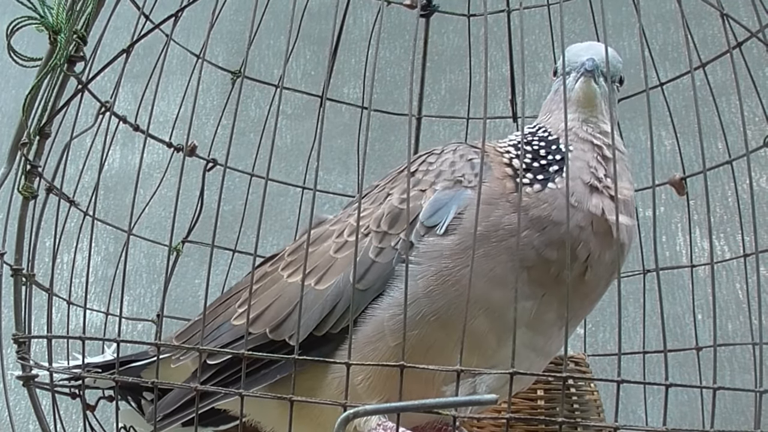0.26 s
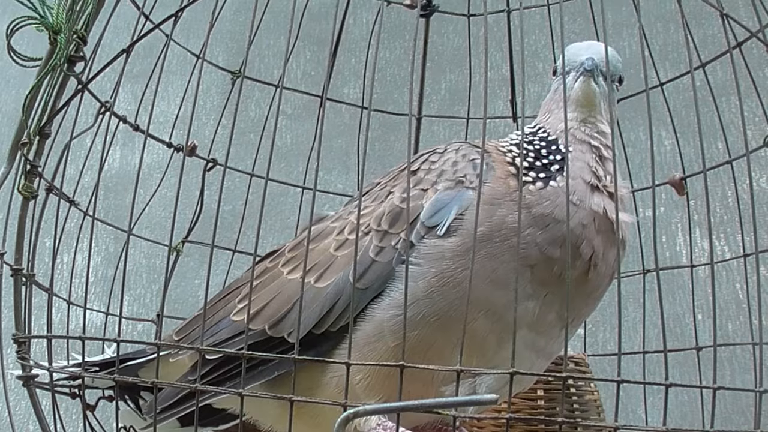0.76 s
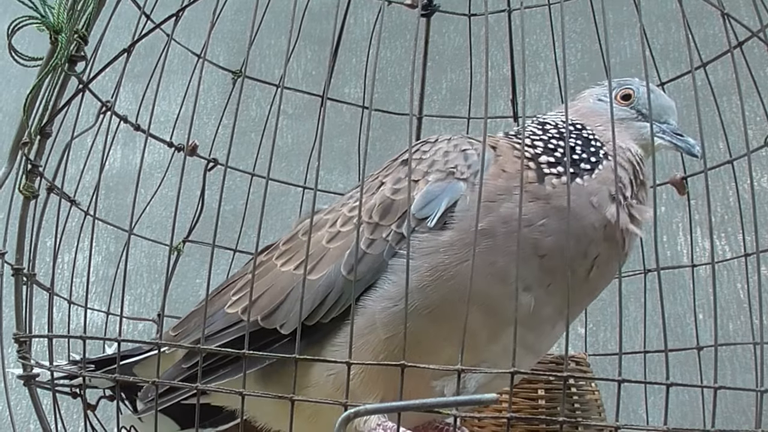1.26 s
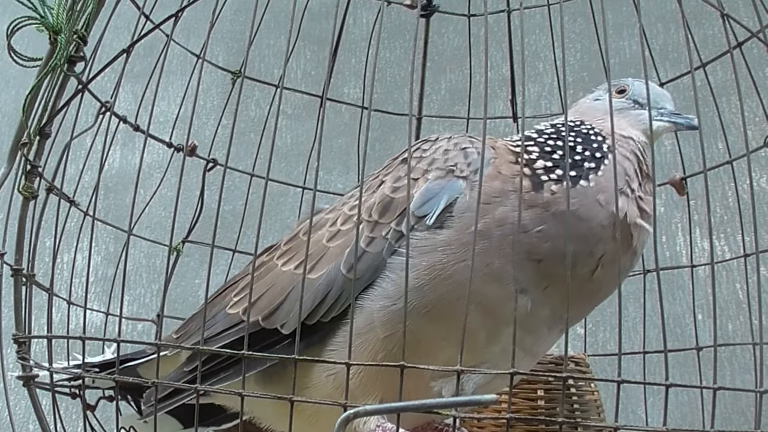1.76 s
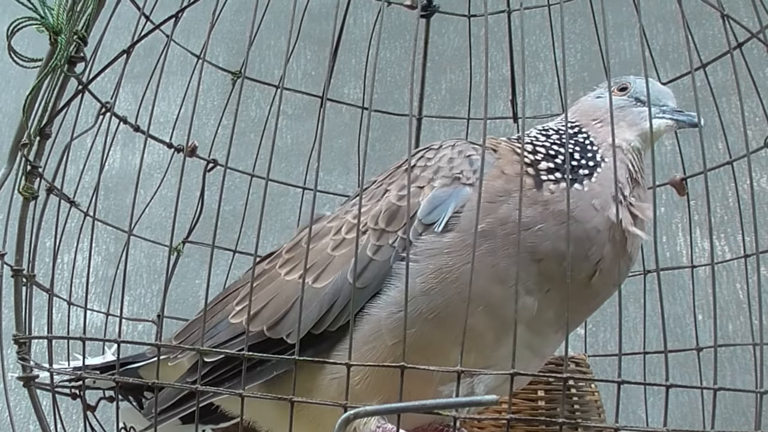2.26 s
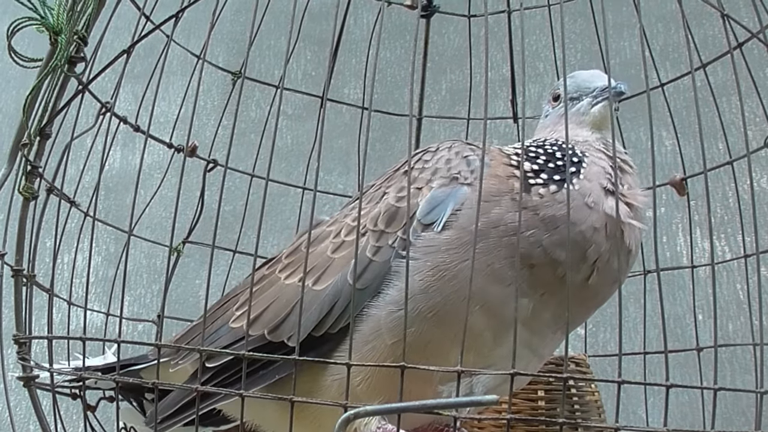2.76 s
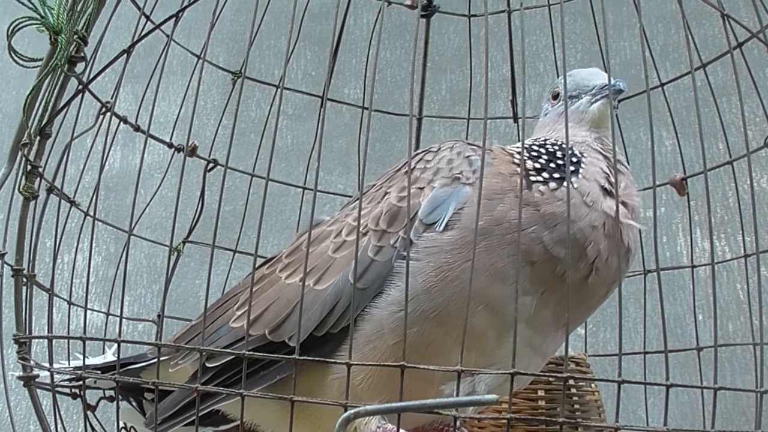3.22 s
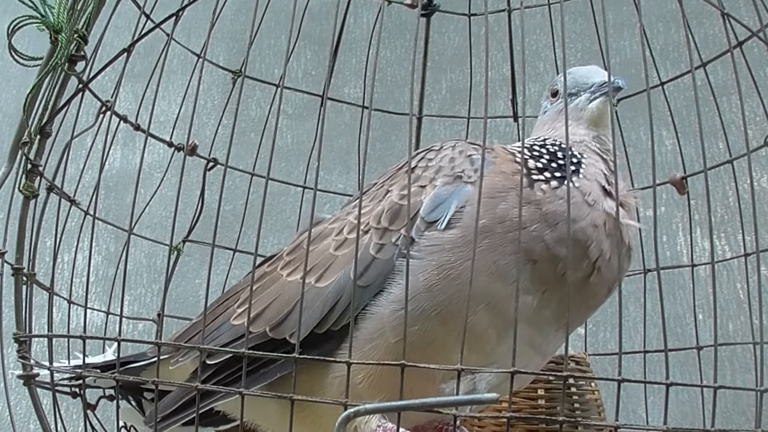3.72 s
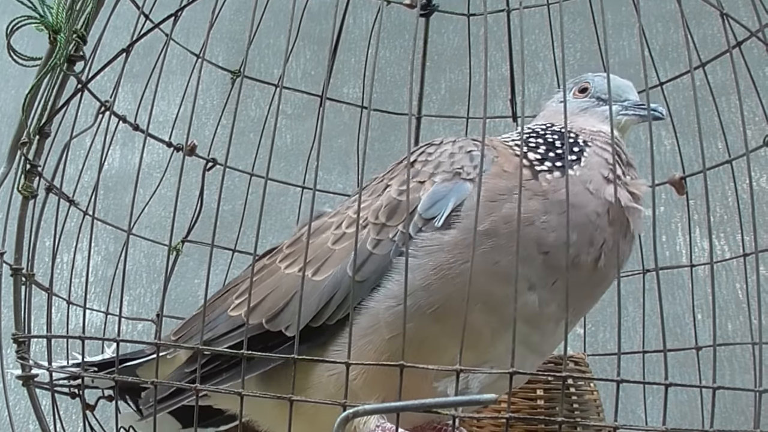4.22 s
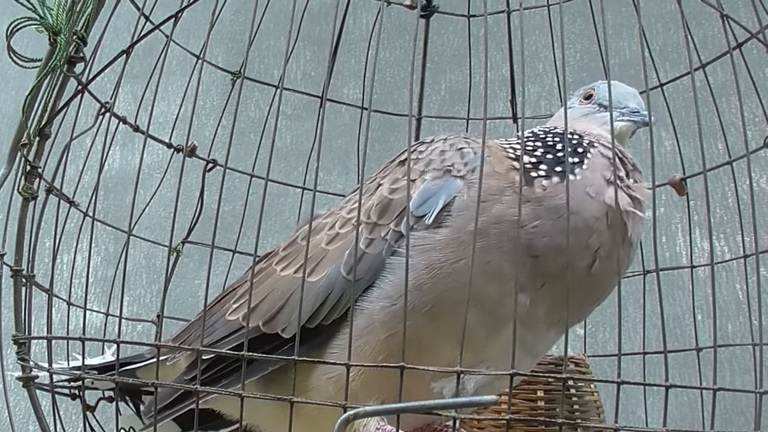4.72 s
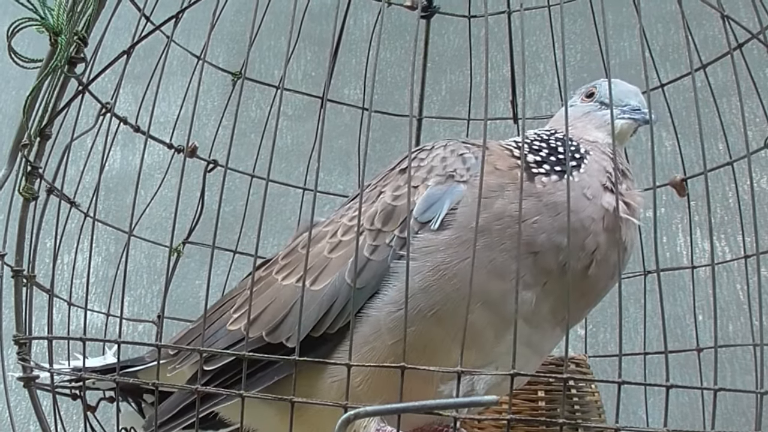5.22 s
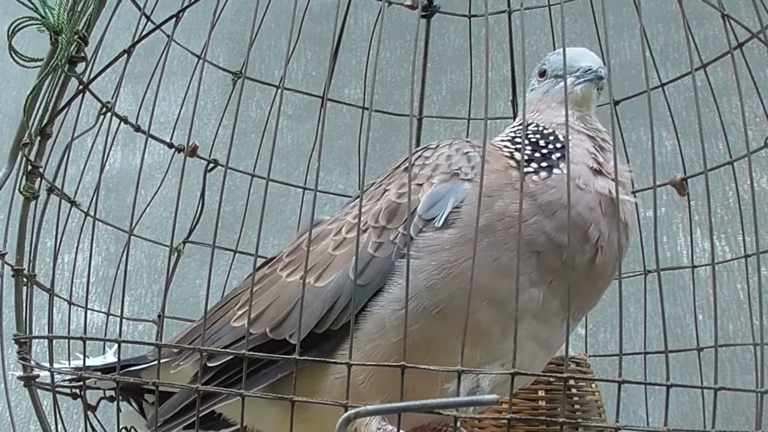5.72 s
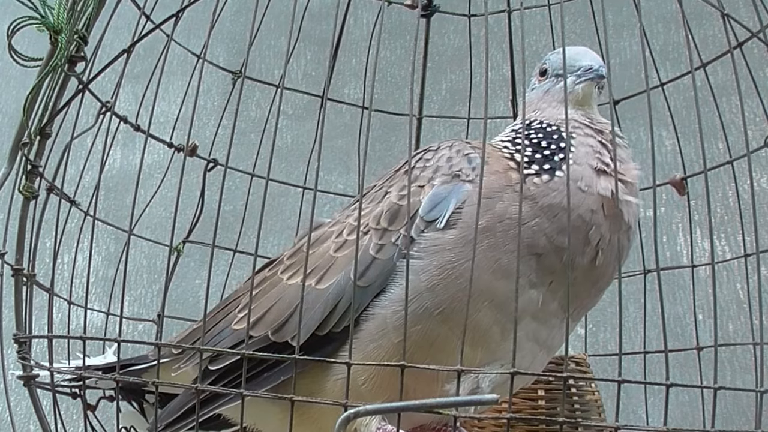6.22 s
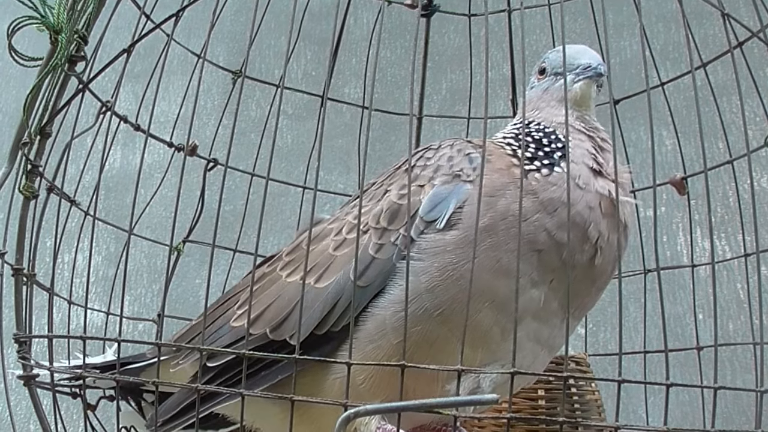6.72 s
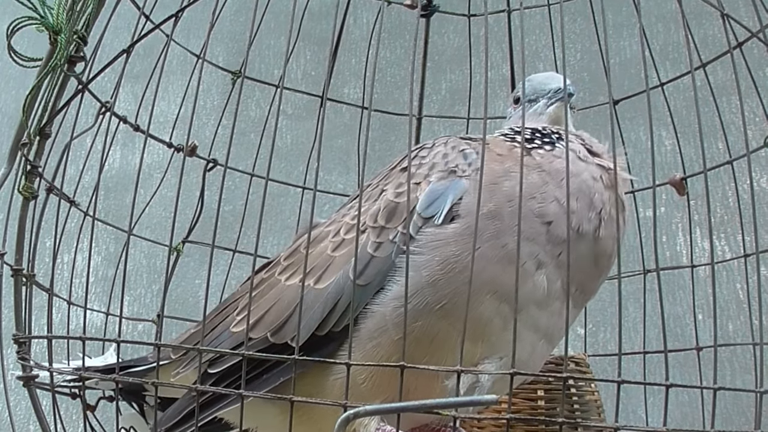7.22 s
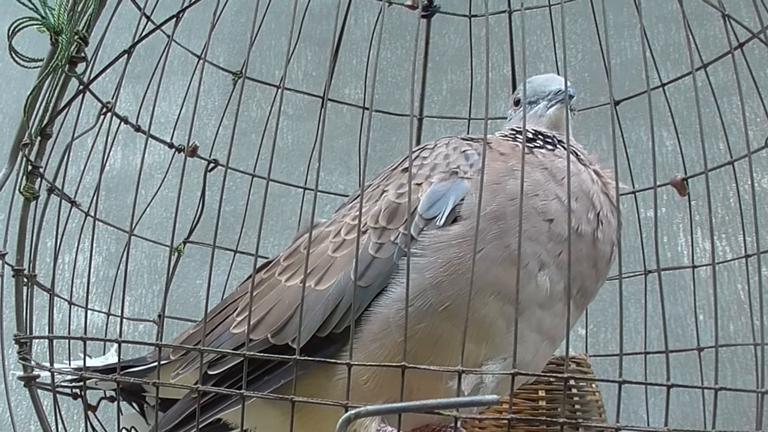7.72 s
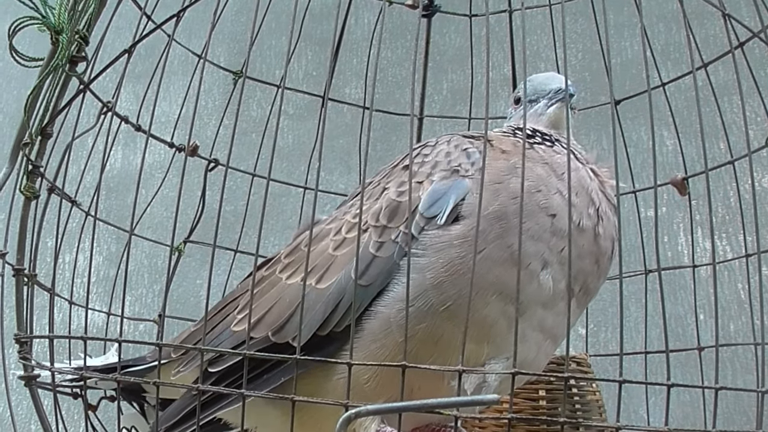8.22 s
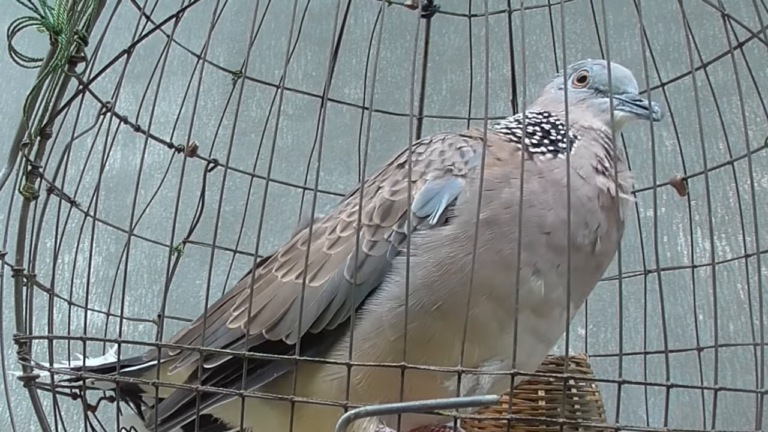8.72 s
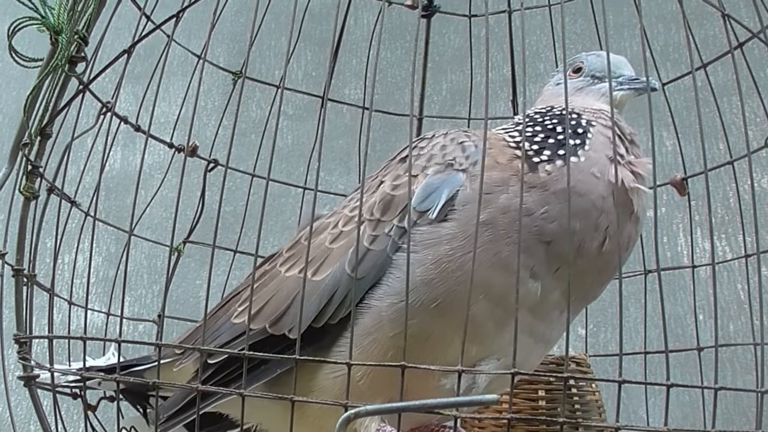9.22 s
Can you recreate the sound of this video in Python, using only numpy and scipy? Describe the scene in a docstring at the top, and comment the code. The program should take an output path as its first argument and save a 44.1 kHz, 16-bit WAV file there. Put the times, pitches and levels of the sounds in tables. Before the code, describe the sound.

A spotted dove coos three fluttering phrases up close, over faint cicadas and a distant traffic rumble.

```python
"""Distant cicadas buzz, chirp and whine over a traffic rumble, with faint rustles and scuffs.
Close to the camera, a caged spotted dove sings three phrases: two short rising coos, a long falling one.
Each coo is a nearly pure tone, chopped by a fast flutter in the throat and echoed faintly by walls.
The cicadas buzz as their tymbal clicks ring their bodies; the limiter ducks them under the loud coos."""
import sys
import numpy as np
from scipy import signal
from scipy.fft import rfft, irfft, next_fast_len
from scipy.io import wavfile
from scipy.ndimage import minimum_filter1d, map_coordinates

SR = 44100
rng = np.random.default_rng(int(sys.argv[2]) if len(sys.argv) > 2 else 0)


def generate_wav(sig):
    """Save sig (samples, or channels by samples) to the path in sys.argv[1] as 16-bit PCM at SR."""
    pcm = np.round(np.clip(np.atleast_2d(sig).T, -1, 1) * 32767).astype(np.int16)
    wavfile.write(sys.argv[1], SR, pcm)


N = 417627
TOP_HZ = 15250

# Stereo image of the ambience: freq_hz, left_right_correlation
STEREO_LIKENESS = [(100, 0.88), (700, 0.64), (2000, 0.31), (5000, 0.66), (8500, 0.19), (14000, 0.19)]
# Traffic faders, before trims: time_s, rumble_db, low_drone_db, high_drone_db, overtones_db
TRAFFIC_FADERS = [(0, -56, -61, -54.5, -73), (.8, -54.5, -53.5, -61.5, -49.5), (2.6, -55, -52, -68, -48),
                  (3.9, -55.5, -51, -72.5, -56.5), (4.7, -54.5, -60.5, -62, -55.5),
                  (5.9, -56, -51.5, -67.5, -53), (7, -55, -52, -52, -49.5), (8.1, -57.5, -57, -64, -53.5),
                  (9.47, -56.5, -69, -71.5, -62)]
# Noise colours of the traffic and the bird's scuffs: freq_hz, gain_db
RUMBLE_EQ = [(20, -24.5), (35, -16.5), (60, -3), (120, -2.5), (190, -2.5), (290, -1), (400, -6),
             (700, -9.5), (1000, -14.5), (1400, -19.5), (1900, -31), (4000, -62.5)]
HISS_EQ = [(500, -14), (1500, -3), (2400, 1.5), (4200, 1), (7000, -2), (10000, -3), (13000, 1), (14600, 0),
           (15500, -16)]
SCUFF_EQ = [(500, -20), (2000, -3), (4500, -3), (8000, -10.5), (14000, -22.5)]
# Soft rustles, two brief low knocks ringing near 770 Hz and, in the last row, a faint breathy overtone
# of the last long coo: centre_s, half_length_s, centre_hz, width_octaves, level_db
SWELL_CUES = [(0.051, .12, 1670, 0.7, -59), (.06, .27, 810, 0.14, -50.5), (0.459, .13, 840, 0.069, -49),
              (0.889, .13, 1590, .3, -55), (2.186, 0.12, 2090, 0.16, -59.5), (2.258, 0.04, 750, 0.09, -46),
              (4.018, .14, 6540, 1, -57), (4.211, .15, 5380, .93, -56.5), (7.02, .033, 766, .1, -50),
              (8.671, .15, 2200, 0.45, -62), (9.11, .13, 2130, .16, -58)]
# The bird shifting about: start_s, level_db
SCUFF_CUES = [(.145, -60), (.43, -59), (1.304, -53), (2.585, -52), (3.37, -57)]

# Cicada faders, before trims: time_s, chorus_db, nearest_buzz_db, nearest_whine_db
CICADA_FADERS = [(0, -61, -65.5, -65.5), (1.9, -59.5, -62, -57), (2.3, -59.5, -55, -54.5),
                 (3.7, -58.5, -56.5, -50.5), (5.2, -59, -56, -55.5), (6.2, -59, -55, -57),
                 (7.5, -58, -60.5, -58.5), (9.47, -62, -65.5, -60.5)]
# Body resonances of the chorus, the nearest cicada and the chirper: centre_hz, width_hz, gain_db
CHORUS_MODES = [(2953, 140, -.5), (5868, 330, 1.5), (8550, 620, -3.5), (11400, 460, -5), (13900, 370, -5)]
BUZZ_MODES = [(8720, 110, -12), (11570, 400, -6), (14300, 360, 2)]
CHIRP_MODES = [(5900, 130, -6), (8510, 230, -11), (11200, 300, -7.5), (14080, 220, -0.5)]
CICADA_PHRASES = [(0, .6), (1.63, 4), (2.48, 6), (4.02, 9), (6.18, 13), (7.72, 17), (9.45, 21)]  # the nearest cicada's pacing: time_s, phrases_sung
CLICK_RATE = [(0, 284), (2.3, 280), (5.5, 275.3), (9.5, 270)]  # its tymbal's base beat: time_s, rate_hz
WHINE_GLIDE = [(0, 6024), (1.5, 5863), (2.5, 5750), (6.5, 5668), (9.47, 5594)]  # its sinking whine: time_s, pitch_hz
CHIRP_CUES = [(0.183, 1.4, .39, -63), (6.25, 8.1, .227, -56), (8.277, 9.47, .227, -59)]  # runs of even chirps: start_s, end_s, period_s, level_db
SQUEAK_CUES = [(.98, 5860, -56), (2.68, 5930, -53.5), (8.3, 5790, -58)]  # stray insect whines: centre_s, pitch_hz, level_db

WALL_TAPS = [(.055, -34.5), (.105, -38), (.132, -39)]  # slaps off the walls: delay_s, gain_db
DOVE_PAN = [(450, 1.4), (750, 2.1), (1200, 3.3)]  # the dove's lean to the left: freq_hz, left_over_right_db
THROAT_EQ = [(850, -2.5), (1000, -16), (1130, -26), (1400, -38), (1600, -49), (1900, -51), (2200, -56),
             (2500, -65), (3400, -50), (4400, -46), (5200, -70)]  # what the swollen throat passes of the overtones: freq_hz, gain_db
RASP_EQ = [(250, -29), (450, 2), (800, -0.5), (1200, -3), (1450, -17.5), (1750, -25.5)]  # colour of the air in the flutter: freq_hz, gain_db
# Contour of each kind of coo, before stretch, shift and gain: time_s, pitch_hz, level_db
OPENING_CONTOUR = [(0, 418, -30), (.011, 516, -23), (.032, 617, -11.5), (.054, 641, -9), (.07, 602, -14),
                   (.09, 603, -30.5)]
RISING_CONTOUR = [(0, 559.4, -40.5), (.028, 515.3, -35), (.042, 528.5, -18.5), (.072, 628.6, -10.5),
                  (.092, 671.5, -1.5), (.106, 738, -1.5), (.116, 796.3, -6.5), (.13, 780, -2.5),
                  (.142, 785, -6), (.151, 674, -3.5), (.158, 709, -23), (.175, 728, -30)]
FALLING_CONTOUR = [(0, 615, -28), (.008, 645, -4.5), (.016, 654, -8), (.025, 662.4, -32), (.032, 691, -0.5),
                   (.07, 750, -2), (.125, 722.3, -2.6), (.21, 688, -2), (.255, 650.6, -4.5),
                   (.305, 609.5, -13), (.345, 572, -17), (.385, 531.3, -24), (.436, 478, -26.5),
                   (.447, 396, -34.5), (.458, 350, -33.5)]
# The coos of each kind: start_s, length_s, gain_db, shift_hz, flutter_start_s, flutter_end_s,
# flutter_depth (capped at 1), flutter_hz, speed_up_hz_per_s
OPENING_CUES = [(1.136, 0.091, 1, -0.5, 1.182, 1.255, 0.91, 66, 0),
                (4.055, 0.088, 0.5, -0.5, 4.098, 4.17, 0.91, 60, 0),
                (8.506, 0.09, -0.5, 3.5, 8.557, 8.625, 1.1, 70, 0)]
RISING_CUES = [(1.268, .179, 0, -0.5, 1.278, 1.4, 0.78, 76.5, 0),
               (4.196, .168, 0, -10, 4.199, 4.295, .68, 80.75, 0.0042),
               (8.648, 0.17, 0.0016, 8.5, 8.654, 8.742, 0.9, 85.7, 0.0015)]
FALLING_CUES = [(1.584, 0.44, 0, 0, 1.609, 1.885, 0.96, 53.12, 45.7),
                (4.505, .439, 0, -3, 4.534, 4.78, .93, 42.6, 129),
                (8.958, .465, -.3, 3, 8.983, 9.25, 0.97, 52.1, 45.2)]


def amp(db):
    """Decibels to gain."""
    return 10 ** (np.asarray(db) / 20)


def unit(x):
    """x at rms 1."""
    return x / np.sqrt(np.mean(x ** 2) + 1e-20)


def along(points, hz):
    """Read (freq_hz, value) points on a log frequency axis."""
    freqs, values = np.transpose(points)
    return np.interp(np.log(hz + 1), np.log(freqs + 1), values)


def curves(rows, t):
    """One automation curve for each column after the time."""
    times, *columns = np.transpose(rows)
    return [np.interp(t, times, column) for column in columns]


def wobble(rate_hz, t):
    """A smooth random modulator."""
    position = (t - t[0]) * rate_hz
    coarse = position[::16]
    knots = rng.standard_normal(int(position[-1]) + 4)
    return np.interp(position, coarse, map_coordinates(knots, [coarse]))


def sine(pitch_hz):
    """An oscillator that follows a pitch curve."""
    return np.sin(2 * np.pi * np.cumsum(pitch_hz) / SR)


def filtered(x, response):
    """x through an EQ given as gain against frequency."""
    size = next_fast_len(x.shape[-1] + SR // 4)
    return irfft(rfft(x, size) * response(np.fft.rfftfreq(size, 1 / SR)), size)[..., :x.shape[-1]]


def resonances(modes, hz):
    """Gain of a few steep-sided resonances."""
    return sum(amp(db) / (1 + 2 * ((hz - centre) / width) ** 2) for centre, width, db in modes)


def diffuse(response):
    """Stereo noise of rms 1 that arrives from all around."""
    def mid_side_eq(hz):
        spread = np.arccos(np.clip(along(STEREO_LIKENESS, hz), -1, 1)) / 2
        return response(hz) * np.array([np.cos(spread), np.sin(spread)])
    mid, side = filtered(rng.standard_normal((2, N)), mid_side_eq)
    return unit(np.array([mid + side, mid - side]))


def swell(t, centre_s, half_length_s):
    """A smooth fade up to 1 and back to silence."""
    return np.cos(np.pi / 2 * np.clip((t - centre_s) / half_length_s, -1, 1)) ** 2


def traffic(t, rumble_trim_db=8, low_trim_db=-1.5, high_trim_db=-2.5, overtone_trim_db=-2.5, hiss_db=-60):
    """The far traffic bed: a rumble with two engine drones in it, and a steady hiss above."""
    def drone(pitch_hz):
        return np.sqrt(2) * amp(2.1 * wobble(7.6, t)) * sine(pitch_hz + 3 * wobble(14, t))
    rumble_db, low_db, high_db, overtone_db = curves(TRAFFIC_FADERS, t)
    rumble_gain = amp(rumble_db + rumble_trim_db + wobble(6.5, t))
    rumble = rumble_gain * diffuse(lambda hz: amp(along(RUMBLE_EQ, hz)))
    engines = amp(low_db + low_trim_db) * drone(91) + amp(high_db + high_trim_db) * drone(114)
    overtones = amp(overtone_db + overtone_trim_db) * unit(drone(137) + drone(182) + drone(228))
    hiss = amp(hiss_db) * diffuse(lambda hz: amp(along(HISS_EQ, hz)))
    return rumble + engines + overtones + hiss


def noise_swells(t):
    """Brief soft bands of noise: rustles, low ringing knocks and the last coo's breathy overtone."""
    out = np.zeros((2, N))
    for centre_s, half_length_s, centre_hz, octaves, db in SWELL_CUES:
        near = np.abs(t - centre_s) < half_length_s
        band = lambda hz: np.exp(-.5 * (np.log2((hz + 1) / centre_hz) / octaves) ** 2)
        noise = .5 * rng.standard_normal((2, near.sum())) + rng.standard_normal(near.sum())
        out[:, near] += amp(db) * unit(filtered(noise, band)) * swell(t[near], centre_s, half_length_s)
    return out


def tymbal(rate_hz, modes, scattered_db=-4):
    """A cicada's clicks ring its body; most of the buzz comes straight, the rest scattered by leaves."""
    angle = np.pi * (np.cumsum(rate_hz) / SR % 1) + 1e-9
    harmonics = int(TOP_HZ / rate_hz.max())
    clicks = np.sin((2 * harmonics + 1) * angle) / np.sin(angle) - 1
    body = lambda hz: resonances(modes, hz)
    return unit(filtered(clicks, body)) + amp(scattered_db) * diffuse(body)


def cicadas(t, chorus_trim_db=3, buzz_trim_db=-1, swell_db=.9, slowing=.014):
    """A far chorus blurs into bands of noise; the nearest cicada swells and slows in each phrase."""
    chorus_db, buzz_db, _ = curves(CICADA_FADERS, t)
    chorus_gain = amp(chorus_db + chorus_trim_db + .6 * wobble(7.8, t))
    chorus = chorus_gain * diffuse(lambda hz: resonances(CHORUS_MODES, hz))
    progress = curves(CICADA_PHRASES, t)[0] % 1
    rate_hz = curves(CLICK_RATE, t)[0] * (1 - slowing * progress + .0003 * wobble(40, t))
    level_db = buzz_db + buzz_trim_db - swell_db * np.cos(2 * np.pi * progress) + 1.6 * wobble(16, t)
    return chorus + amp(level_db) * tymbal(rate_hz, BUZZ_MODES)


def chirps(t, half_length_s=.054, click_hz=276):
    """Another cicada pulses its buzz into runs of short, evenly spaced chirps."""
    envelope = np.zeros(N)
    for start_s, end_s, period_s, db in CHIRP_CUES:
        for centre_s in np.arange(start_s, end_s, period_s):
            envelope += amp(db + rng.normal(0, 1)) * swell(t, centre_s, half_length_s)
    return envelope * tymbal(click_hz * (1 + .001 * wobble(9, t)), CHIRP_MODES)


def whines(t, lead_s=.027, flicker_db=3.5, floor_db=-13, sideband_hz=145, trim_db=-2, whistle_db=-67):
    """A thin whine swells as each cicada phrase ends, over a steadier whistle an octave lower."""
    def tone(hz):
        return amp(flicker_db * wobble(11, t)) * sine(hz * (1 + .0024 * wobble(41, t)))
    pitch_hz, = curves(WHINE_GLIDE, t)
    phrases, = curves(CICADA_PHRASES, t + lead_s)
    envelope = np.abs(np.cos(np.pi * phrases)) ** 6 + amp(floor_db)
    # the tymbal's beat adds side tones
    whine = unit(sum(.65 ** k * tone(pitch_hz + k * sideband_hz) for k in range(3)))
    whistle = unit(tone(pitch_hz / 2) + tone((pitch_hz + sideband_hz) / 2))
    _, buzz_db, whine_db = curves(CICADA_FADERS, t)
    whistle_gain = amp(whistle_db + (buzz_db - buzz_db.max()) / 2 + 2 * wobble(5, t))
    return amp(whine_db + trim_db) * envelope * whine + whistle_gain * whistle


def squeaks(t, half_length_s=.09, waver=.003):
    """A further insect's stray thin tones swell and fade."""
    return sum(amp(db) * swell(t, centre_s, half_length_s) * unit(sine(hz * (1 + waver * wobble(41, t))))
               for centre_s, hz, db in SQUEAK_CUES)


def scuffs(t, scratch_db=3, t60_s=.42):
    """The bird shifts: light scratchy scuffs that start sharply and die away."""
    envelope = sum(amp(db - 60 * np.abs(t - start_s) / t60_s) * (t >= start_s)
                   for start_s, db in SCUFF_CUES)
    grain = unit(amp(scratch_db * wobble(180, t)))
    return envelope * grain * diffuse(lambda hz: amp(along(SCUFF_EQ, hz)))


def yard(x, t60_s=.41, tail_db=-36):
    """The reverb return: a few weak wall slaps and a thin scattered tail."""
    t = np.arange(SR // 2) / SR
    tail = rng.standard_normal((2, len(t))) * amp(-60 * t / t60_s)
    scatter = signal.fftconvolve(x[None], tail / np.linalg.norm(tail[0]), axes=1)[:, :N]
    walls = lambda hz: sum(amp(db) * np.exp(-2j * np.pi * hz * delay_s) for delay_s, db in WALL_TAPS)
    return filtered(x, walls) + amp(tail_db) * scatter


def cage_ring(x, ring_hz=776, width_hz=28, ring_db=-21):
    """The space round the cage resonates, ringing on between the pulses."""
    ring = lambda hz: 1j * hz * width_hz / (ring_hz ** 2 - hz ** 2 + 1j * hz * width_hz)
    return filtered(x, lambda hz: 1 + amp(ring_db) * ring(hz))


def pan_left(x, lag_s=9.5e-5):
    """Sound from a little to the left reaches the left mic port first and louder."""
    def ports(hz):
        lean = amp(along(DOVE_PAN, hz) / 2)
        return np.array([lean, np.exp(-2j * np.pi * hz * lag_s) / lean])
    return filtered(x, ports)


def coo(contour, cue, t, attack_s=.012, fade_share=.39, bend=.064, jitter=.016,
        rasp_db=-35, husk_db=-18, husk_hz=680, crop_hz=1250):
    """A tone that the throat's flutter chops into pulses, each bending up in pitch as it opens."""
    start_s, length_s, gain_db, shift_hz, flutter_start_s, flutter_end_s, deepest, rate_hz, speed_up = cue
    pitch_hz, level_db = curves(contour, (t - start_s) * contour[-1][0] / length_s)
    pitch_hz, level_db = pitch_hz + shift_hz, level_db + gain_db
    slack = np.clip((husk_hz - pitch_hz) / 100, 0, 1)  # at low pitch, slack membranes leak more air
    flutter_s = t - flutter_start_s
    sets_in = flutter_s / attack_s + .5
    dies = (flutter_end_s - t) / (fade_share * (flutter_end_s - flutter_start_s))
    depth = min(deepest, 1) * np.clip(np.minimum(sets_in, dies), 0, 1)
    cycles = rate_hz * flutter_s + speed_up * flutter_s ** 2 / 2 + .035 * wobble(60, t)
    opening = 1 - depth * np.cos(np.pi * (cycles % 1) ** .88) ** 2  # opens faster than it shuts
    dip = bend * depth * np.cos(2 * np.pi * cycles - .92)
    pitch_hz = pitch_hz * (1 - dip + jitter * (depth + .22) * wobble(200, t))
    phase = 2 * np.pi * np.cumsum(pitch_hz) / SR
    edge_fade = np.clip(np.minimum(t - t[0], t[-1] - t) / .003, 0, 1)
    effort = edge_fade * amp(level_db + .5 * wobble(70, t))
    # the beak stays shut: the inflated crop radiates the tone and rounds off its edges
    tone = filtered(effort * opening * np.sin(phase), lambda hz: 1 / (1 + (hz / crop_hz) ** 10))
    # a softer, steadier tone is richer in overtones
    richness = amp(-.33 * np.maximum(level_db + 20, -4) - 6 * depth)
    overtones = richness * sum(amp(along(THROAT_EQ, k * pitch_hz)) * np.sin(k * phase) for k in range(2, 8))
    # leaking air rasps while the throat flutters
    air = unit(filtered(rng.standard_normal(len(t)), lambda hz: amp(along(RASP_EQ, hz))))
    leak = (amp(rasp_db) + amp(husk_db) * slack) * depth * np.sqrt(opening)
    rasp = filtered(effort * leak * air, lambda hz: 1 / (1 + (hz / 1500) ** 12))
    return tone + effort * opening * overtones + rasp


def dove():
    """The lead voice: every coo follows the contour of its kind, stretched to its own length."""
    song = np.zeros(N)
    for contour, cues in [(OPENING_CONTOUR, OPENING_CUES), (RISING_CONTOUR, RISING_CUES),
                          (FALLING_CONTOUR, FALLING_CUES)]:
        for cue in cues:
            start_s, length_s = cue[:2]
            span = np.arange(int(start_s * SR), min(int((start_s + length_s) * SR), N))
            song[span] += coo(contour, cue, span / SR)
    return song


def scene():
    """The mix: the dove up front and a little left, insects and traffic spread wide behind."""
    t = np.arange(N) / SR
    song = cage_ring(dove())
    insects = cicadas(t) + chirps(t) + whines(t) + squeaks(t)
    return pan_left(song) + yard(song) + noise_swells(t) + scuffs(t) + insects + traffic(t)


def record(dry, ceiling_db=-5, release_db_per_s=28):
    """The camera's limiter ducks the mix on loud peaks and creeps back; a high cut follows."""
    over_db = np.maximum(20 * np.log10(np.abs(dry).max(axis=0) + 1e-9) - ceiling_db, 0)
    ahead_db = -minimum_filter1d(-over_db, size=200)  # about 2 ms of look-ahead
    creep_db = release_db_per_s * np.arange(N) / SR
    held_db = np.maximum.accumulate(ahead_db + creep_db) - creep_db
    cut_db = signal.sosfilt(signal.bessel(2, 90, fs=SR, output="sos"), held_db)
    return filtered(dry * amp(-cut_db), lambda hz: hz < TOP_HZ)


dry = scene()
out = record(dry)
generate_wav(out)
```